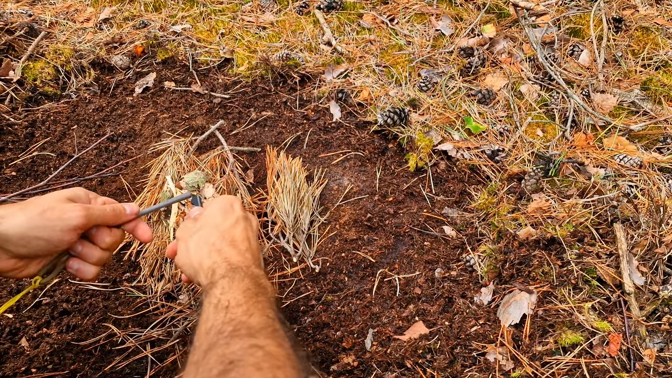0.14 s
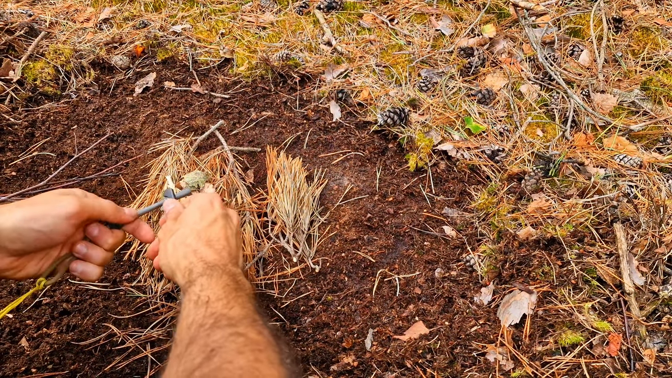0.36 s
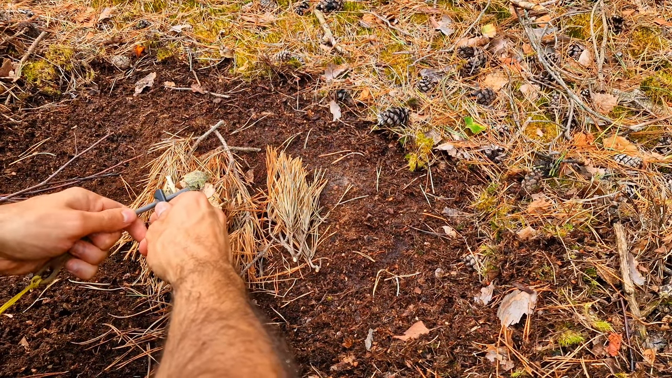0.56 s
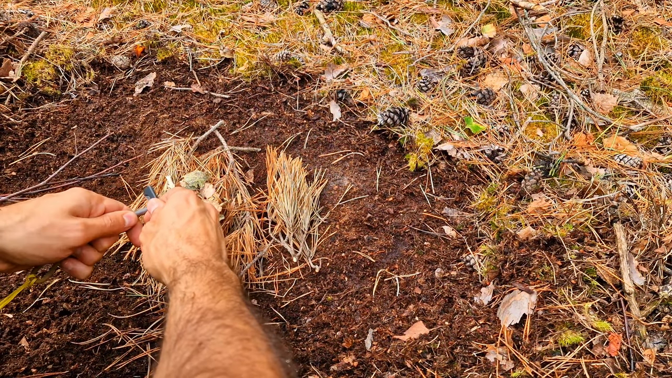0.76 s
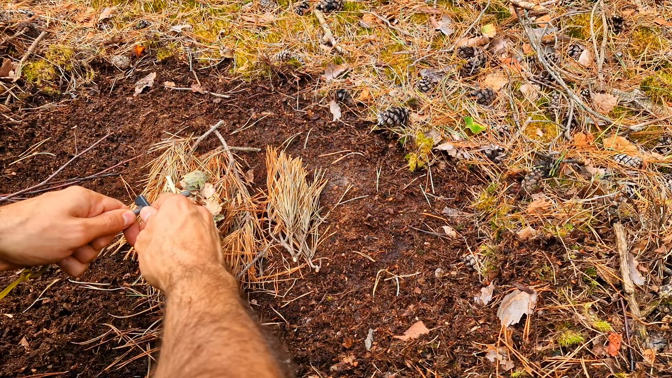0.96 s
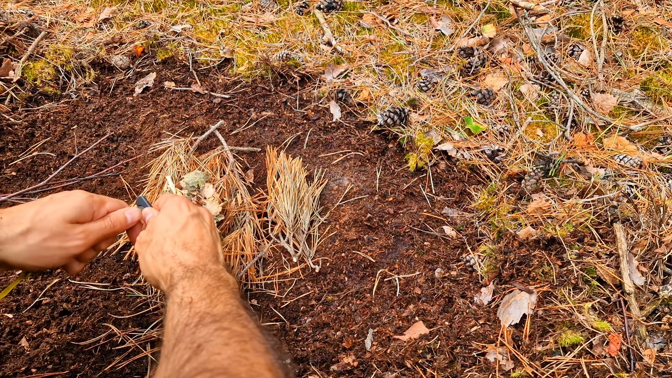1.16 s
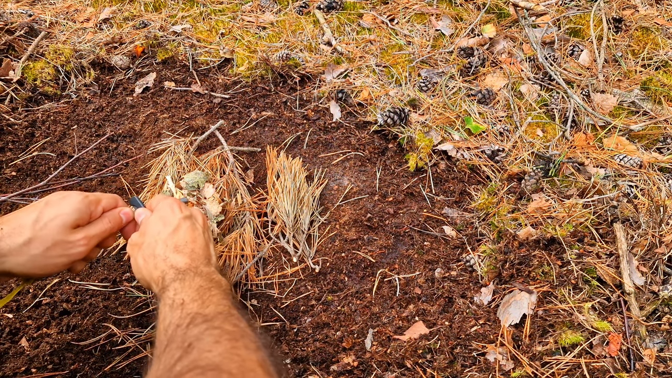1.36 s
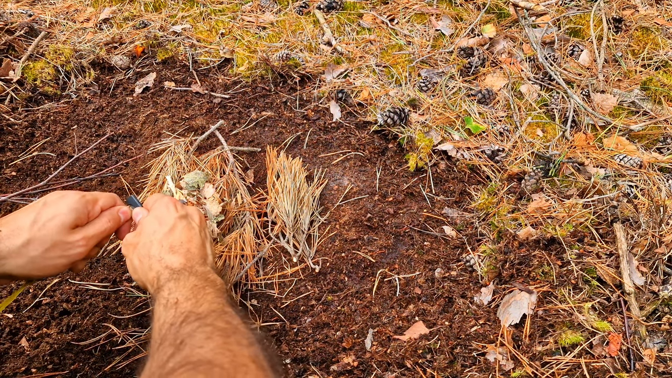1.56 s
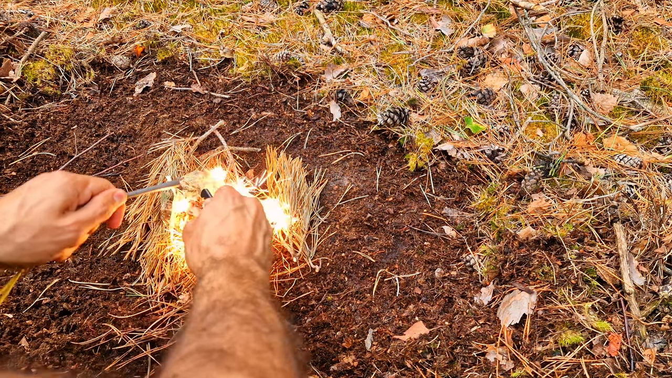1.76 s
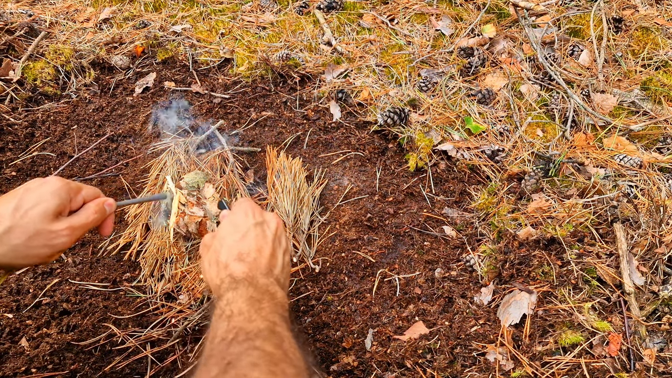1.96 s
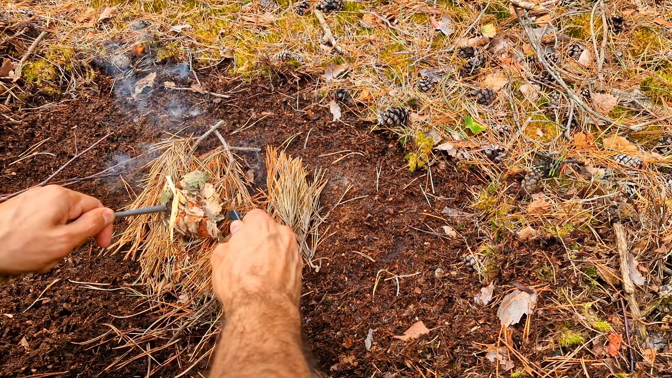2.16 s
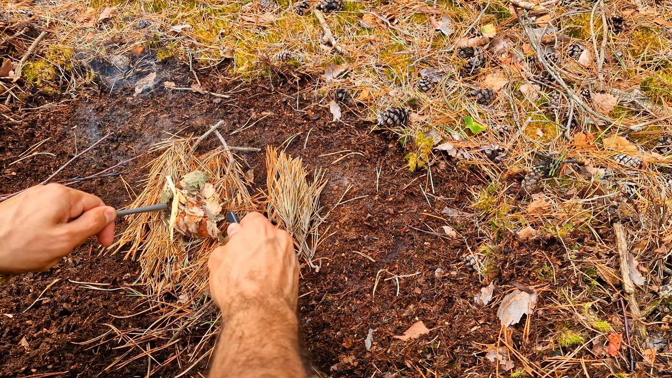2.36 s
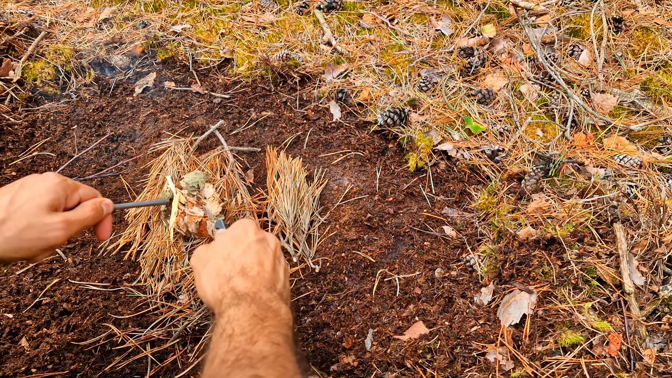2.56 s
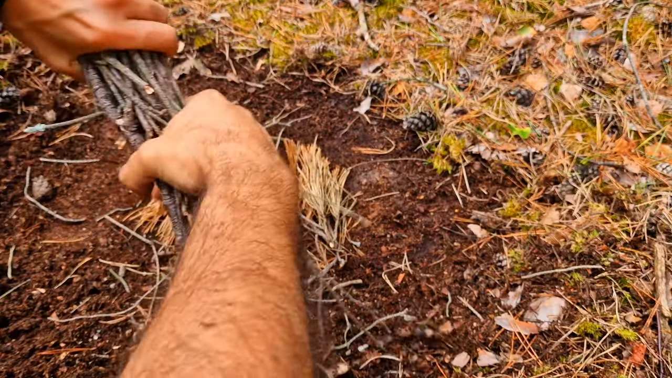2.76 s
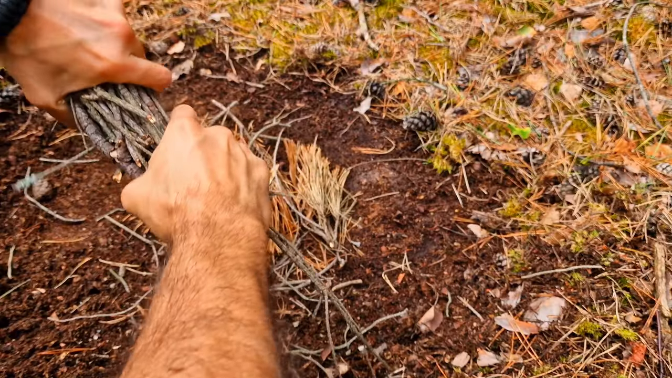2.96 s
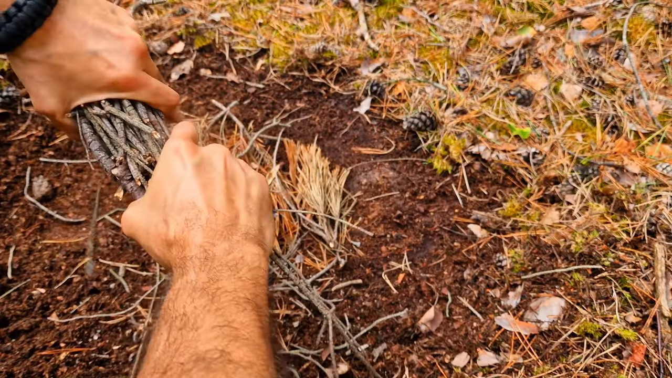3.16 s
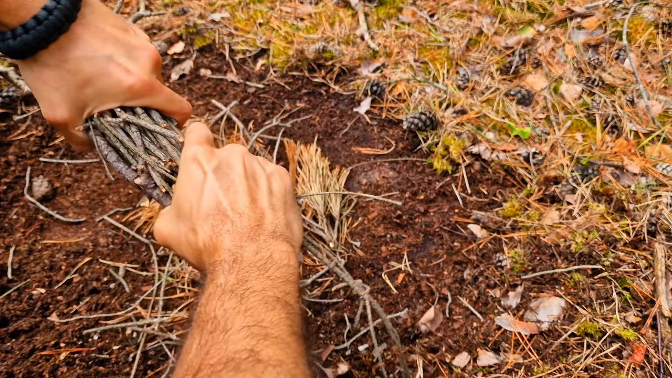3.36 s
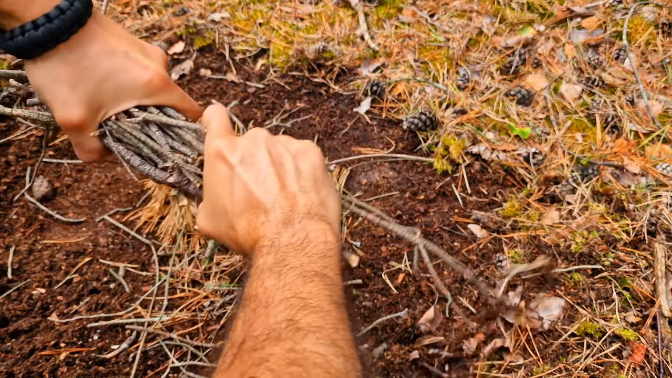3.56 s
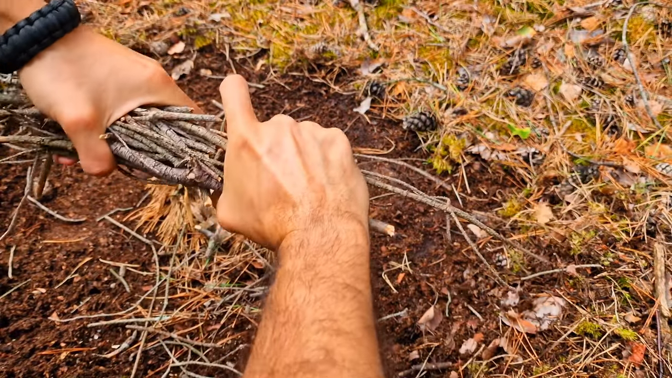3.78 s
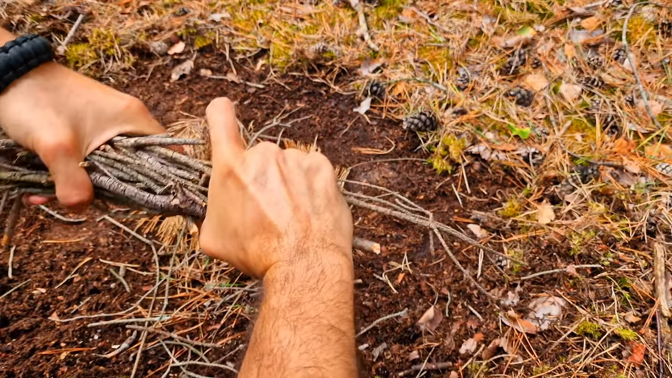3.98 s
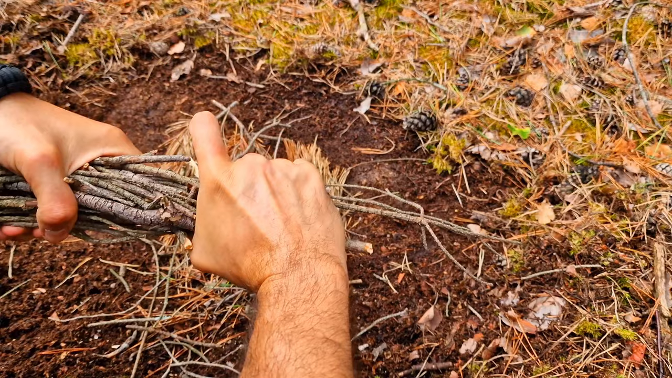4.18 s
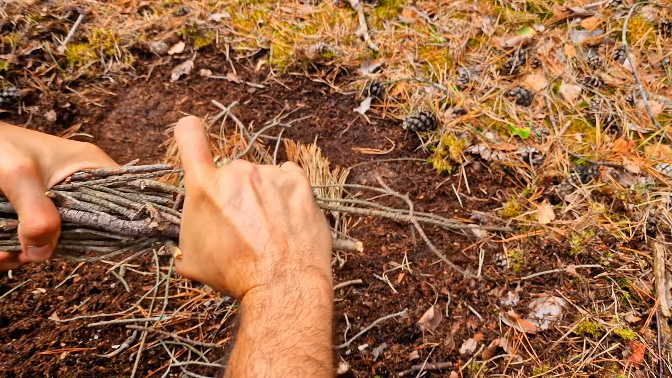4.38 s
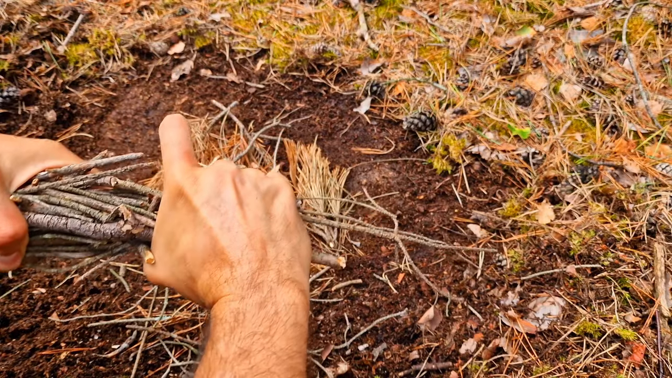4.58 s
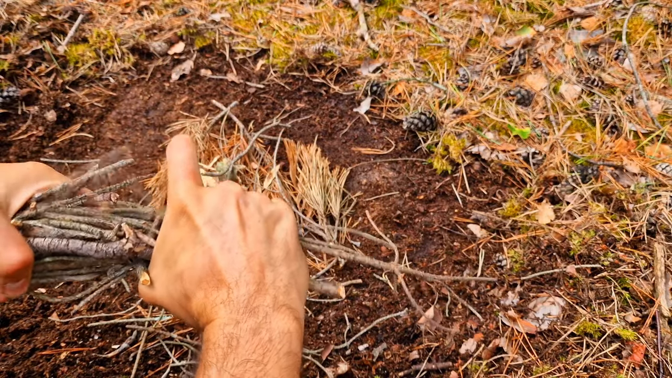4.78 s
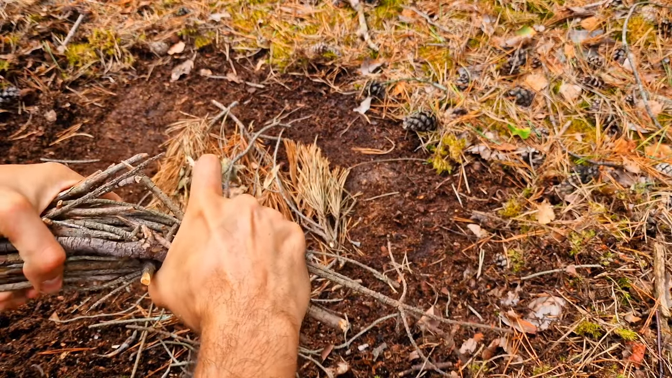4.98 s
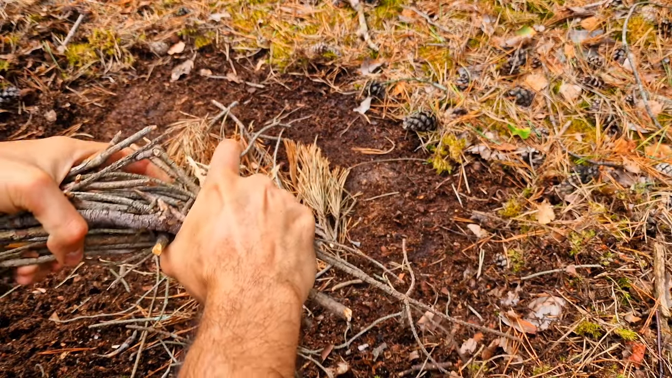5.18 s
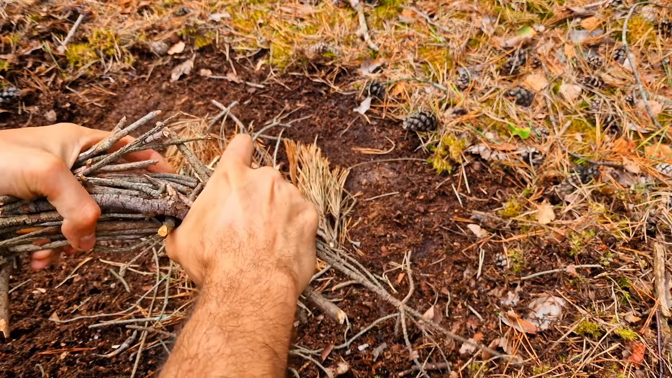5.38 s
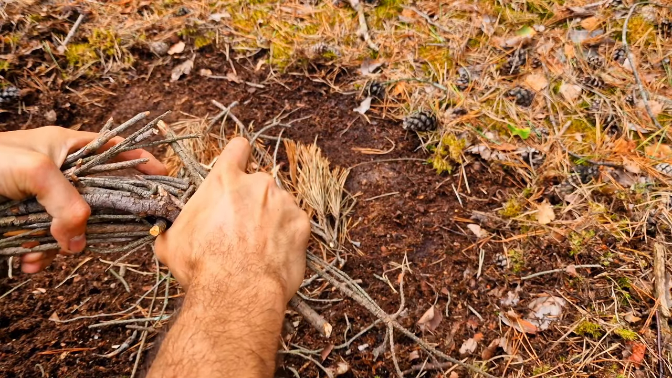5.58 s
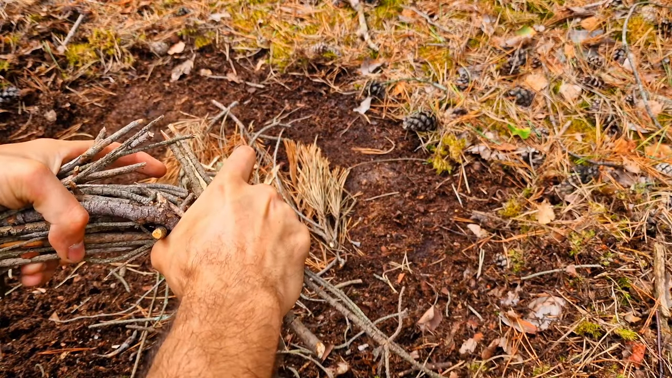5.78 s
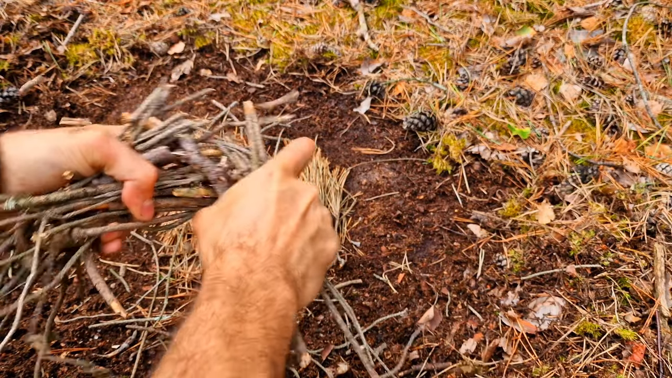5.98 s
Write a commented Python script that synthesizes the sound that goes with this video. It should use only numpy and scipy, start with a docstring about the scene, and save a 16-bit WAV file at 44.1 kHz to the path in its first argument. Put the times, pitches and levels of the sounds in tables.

```python
"""Far songbird whistles and a low wind rumble open the scene, close to a two-port camera on a forest floor.
A knock rings a hollow body, a steel striker scrapes a spark rod, sparks fizz and a flame puffs. Then a bundle of
dry twigs is squeezed and snapped by hand. Snaps, rubs, sparks and wind are coloured noise under envelopes; birds
are gliding sines smeared by a noise tail; the knock is a set of decaying sines.
"""
import sys
import numpy as np
from scipy import signal
from scipy.fft import rfft, irfft
from scipy.io import wavfile
from scipy.ndimage import uniform_filter1d

SR = 44100
rng = np.random.default_rng(int(sys.argv[2]) if len(sys.argv) > 2 else 0)


def gain_from_db(level_db):
    """Convert decibel levels to linear amplitude factors (20 dB per decade)."""
    decades = np.asarray(level_db, float) / 20
    return 10 ** decades


def transcribe(u):
    """Save the signal u as a 16-bit wav file named by the first command-line argument.

    u: samples, shape (n,) or (channels, n), limited to [-1, 1]; the rate is SR.
    q: integer samples, one column per channel.
    """
    v = np.clip(np.atleast_2d(u).T, -1, 1)
    q = np.round(v * 32767).astype(np.int16)
    wavfile.write(sys.argv[1], SR, q)


N = 265923
T = np.arange(N) / SR
BUNDLE_S = 2.74  # the bundle is in hand from here on
PORT_LAG_S = .00022  # near sounds sit to the left and reach the right port later


# Twigs breaking in the hands. Each row: peak time in seconds, crack level in dB over 4 ms, woody lows in dB
# against the crack, brittle highs in dB against the crack, ring in Hz, mostly near 7.3 kHz.
TWIG_SNAPS = [(2.8185, -42, -18, -8, 3880), (2.8286, -38, -17, 1.5, 3750), (2.8388, -41, -17, -6, 5880),
              (2.8501, -36.5, -11, -4, 4780), (2.9173, -26.5, -48, 4.5, 7400),
              (2.9393, -42, -28, 8.5, 6630), (3.0083, -60, -10, 13, 8120), (3.022, -51.5, 3, 9, 3040),
              (3.0742, -30.5, -3, -2.5, 3570), (3.0917, -43, -3, 3, 9410), (3.1813, -35, -10, -7, 7540),
              (3.2055, -25.5, -11.5, 6, 7260), (3.3259, -33.5, -12, -19, 3530),
              (3.3507, -15, -9.5, 2.5, 680), (3.3587, -29.5, -12.5, 5, 7450), (3.3888, -44, -8, 4, 7210),
              (3.4434, -36.5, -11, 8, 7050), (3.4806, -47, -22, 17, 8350), (3.4918, -30.5, -6.5, 6, 6700),
              (3.5027, -38, -5, 6, 6240), (3.5403, -45, -11, 12, 7360), (3.556, -30, -35, 1.5, 7520),
              (3.5829, -44.5, -3, 8, 6870), (3.5967, -49, -3, 15, 7620), (3.6324, -16.5, -9.5, 2, 7330),
              (3.6381, -17, -17, 7.5, 7880), (3.6482, -30, -5, 7, 8200), (3.6647, -42, -8, 3, 8660),
              (3.6937, -23.5, -3.5, 3.5, 1850), (3.6979, -29.5, -8, -3, 7060), (3.7082, -43, -8, 11, 7520),
              (3.7323, -37, -14, 0, 3250), (3.7505, -18, -20, -1, 6650), (3.7674, -36, -11.5, 14, 7600),
              (3.8184, -41, -11, 2, 7260), (3.8333, -26.5, -34, 4, 7240), (3.8449, -35, -16, 4.5, 7300),
              (3.8825, -41, -33, 0, 5030), (3.9154, -39.5, -35, 1.5, 6230), (3.9456, -41.5, -23, -13, 3830),
              (4.0138, -46, -22, 4, 7410), (4.0458, -19.5, -4, 6.5, 1100), (4.0849, -33, -23, 4, 6310),
              (4.0982, -23, -27, 5, 6940), (4.1179, -28, -32, 8, 6590), (4.1288, -10.5, -18, -4, 4710),
              (4.1676, -38, 1, 0, 1590), (4.2461, -47, -17, 2, 3550), (4.2785, -41, -6, -9, 7130),
              (4.2847, -41, -14, 1, 5430), (4.2972, -34, -21, -1, 7060), (4.3091, -13.5, -17, -6, 6650),
              (4.3152, -20, -11, 1, 7300), (4.3415, -42, -17, -4, 4240), (4.3502, -42, -22, -3, 8630),
              (4.3712, -21, -25, 2, 7550), (4.486, -27, -16, 4, 790), (4.5668, -8.5, -13, -2.5, 3100),
              (4.5843, -34, -23, -2, 7130), (4.6574, -38.5, -22, -9, 7580), (4.7105, -20.5, -8, 9, 7300),
              (4.7194, -13, -26, 3, 7770), (4.7305, -18, -11, -3, 4470), (4.7388, -38, -27, 11, 7800),
              (4.7497, -25, -37, 4, 6200), (4.7692, -11, -8, -2.5, 7670), (4.802, -15, -8.5, 4, 7540),
              (4.8302, -13.5, -12.5, -3, 3530), (4.8471, -18.5, -15, 2, 6600),
              (4.8722, -13.5, -9, -0.5, 5600), (4.8846, -23, -14, -0.5, 6160), (4.9344, -31, -4.5, 8, 9550),
              (5.0204, -37.5, -4, 16.5, 8900), (5.0393, -43, -3, 4, 7880), (5.0502, -44.5, -2, -3, 5190),
              (5.1346, -26, -20, 1.5, 8420), (5.1408, -41, -25, 9, 7520), (5.1495, -28, -36, -9, 7200),
              (5.1615, -40, -14, -8, 3660), (5.2065, -33, -27, 2, 5020), (5.2246, -12, -33, 1, 5230),
              (5.2371, -13.5, -16, 1.5, 7550), (5.272, -15.5, -18.5, 3, 6160), (5.2881, -32, -13, 2, 7670),
              (5.3554, -33.5, -4, -10, 1970), (5.3833, -27.5, -49, 4.5, 8350), (5.4347, -55, -18, 10, 7470),
              (5.5064, -56.5, -16, 16, 6480), (5.5268, -36, -13, 0.5, 6240), (5.5354, -53, -18, 13, 7130),
              (5.5705, -43, -29, 12.5, 7300), (5.6294, -40, -20, -8, 4220), (5.6691, -42, -31, 12.5, 7000),
              (5.6733, -36, -14, -11, 3850), (5.7124, -37.5, -37, -4.5, 7100),
              (5.7849, -35, -15, -3.5, 4670), (5.8538, -12, -22.5, 1, 7540),
              (5.8716, -16.5, -36, 2.5, 6630), (5.8907, -11.5, -15, 3.5, 7080),
              (5.9011, -14, -17, -0.5, 7340), (5.9145, -19.5, -9, 6.5, 5300), (5.9264, -19, -15, 5, 7070),
              (5.9391, -29, -23, 1, 5510), (5.9483, -26, 0, 12.5, 7300), (5.9838, -27.5, -11, 1.5, 770)]


def twig_snaps():
    """Each stick breaks as one crack, with faint cracks at chance moments between."""
    return cracks(list(TWIG_SNAPS) + faint_cracks(count=90))


def faint_cracks(count):
    """Small fibres give way at random: mostly faint rows, each with its own colour and ring."""
    moment, loudness, pitch = rng.random((count, 3)).T
    low, high = rng.standard_normal((count, 2)).T
    peak_s = BUNDLE_S + moment * (T[-1] - BUNDLE_S)
    crack_db = -57 - 2.5 * np.log(loudness)
    ring_hz = 7600 * (1 - .55 * pitch ** 3)
    return list(zip(peak_s, crack_db, -13 + 5 * low, 4 + 5 * high, ring_hz))


# Small ticks of rod and striker. Each row: peak time in seconds, crack level in dB over 4 ms, lows in dB #
# against the crack, highs in dB against the crack, ring in Hz.
ROD_TICKS = [(.94, -50.5, -33, -15, 4340), (1.884, -48, -6, -11, 5030), (2.007, -44, -18, -10, 5000),
             (2.014, -54, -4, 4, 6000), (2.075, -46, -10, 2, 6000)]


def rod_ticks():
    """Rod and striker tick as small cracks."""
    return cracks(ROD_TICKS)


def crack_shape(t):
    """Fibres tear within a few ms: a quick swell, a steep fall, a fainter scatter, then splinters."""
    rise = np.exp(t / .0005) + gain_from_db(-21) * np.exp(t / .0057)
    scatter = gain_from_db(-18) * np.exp(-t / .005)  # off the bundle
    splinters = gain_from_db(-31) * np.exp(-t / .013)  # keep tearing after the crack
    return np.where(t < 0, rise, np.exp(-t / .0011) + scatter + splinters)


def cracks(rows):
    """A ragged noise burst per row, split into woody, middle and brittle bands, with one ring per crack."""
    size, lead = 2560, 448  # samples in a crack, and of them before its peak
    out = np.zeros((2, N + 4096))
    t = (np.arange(size) - lead) / SR
    shape = crack_shape(t)
    core = (t > -.0015) & (t < .0025)  # the 4 ms that set the level
    for s, crack_db, low_db, high_db, ring_hz in rows:
        # thicker sticks have stronger and deeper lows
        wood_hz = (1500 - 15 * low_db) * np.exp(.08 * rng.standard_normal())
        wood_hz = min(np.clip(wood_hz, 600, 2100), ring_hz)  # a thick stick rings in the lows
        ragged = gain_from_db(3.0 * np.repeat(rng.standard_normal(size // 16), 16))
        burst = pair(0.45, PORT_LAG_S, size=size) * shape * ragged
        # the hands work a little left and drift to the middle
        pan_db = 3 - .6 * s + rng.standard_normal()
        ring = 0.79 * colour(burst, [(ring_hz / 1.42, -30), (ring_hz, 0), (ring_hz * 1.12, -30)])
        wood = colour(burst, [(100, -30), (250, -10), (wood_hz / 1.92, -7), (wood_hz, 0),
                              (wood_hz * 1.36, -6), (wood_hz * 3, -30)])
        body = colour(burst + ring, [(1500, -30), (2200, -4), (2800, -8), (4300, 0), (7000, -1), (8500, -30)])
        brittle = colour(burst + ring, [(5800, -30), (7400, 0), (10200, -3), (16000, -2), (17500, -20)])
        bands = [(0, body), (low_db, wood), (high_db, brittle)]
        sound = sum(gain_from_db(db) * x / np.std(x[:, core]) for db, x in bands)
        i = int(s * SR) - lead
        out[:, i:i + size] += sound * gain_from_db(crack_db + np.array([[pan_db], [-pan_db]]) / 2)
    return out[:, :N]


# Creaking of the bundle in the hands. Each row: time in seconds, rustle level in dB.
RUSTLE_LEVEL = [(2.74, -55), (2.82, -43), (3.03, -51), (3.3, -58), (3.45, -46.5), (3.8, -46), (3.97, -56.5),
                (4.13, -38), (4.35, -55), (4.61, -50.5), (4.74, -38), (4.88, -41), (4.99, -52), (5.12, -53),
                (5.25, -38), (5.33, -50), (5.55, -59), (5.82, -50), (5.93, -34), (6.0, -50)]
# Tone of bark and crushed needles. Each row: frequency in Hz, density in dB per Hz.
NEEDLE_TONE = [(150, -42), (250, -9.5), (955, -8), (2090, -0.5), (2530, -5), (7190, 4.5), (10700, -8),
               (14900, 1.5), (16000, -25)]


def rustle():
    """Bark rubs and needles crush: dense small clicks over a soft hiss."""
    grains = pair(0.16, PORT_LAG_S) * (0.51 + 0.65 * crackle(300, 6, 0.0011))
    grip = 0.3 + .85 * abs(flutter(25.4, size=N))  # slips and holds
    left_right = gain_from_db(np.array([[1.2], [-1.2]]))
    return unit(colour(grains * grip, NEEDLE_TONE)) * curve(RUSTLE_LEVEL) * left_right


def strike():
    """Striker on spark rod: one gritty noise feeds scrape and sparks; steel and flame join in."""
    grit = pair(0.36, PORT_LAG_S) * (.8 + .6 * crackle(700, 3, .0015))
    return scrape(grit) + sparks_and_needles(grit) + steel_ring() + flame_and_thud()


# Tone of the scrape. Each row: frequency in Hz, density in dB per Hz.
SCRAPE_TONE = [(1200, -28), (2400, -20), (2900, -8), (4300, 0), (6000, -8), (11000, -8), (15500, -1),
               (16500, -6)]
# Steel along the rod. The row: time at full level in seconds, level in dB, hold in seconds,
# rise in dB per second, fall in dB per second.
SCRAPE_SWELL = (1.624, -28, .072, 3000, 700)


def scrape(grit):
    """Steel drags along the rod: gritty noise with a short flat swell."""
    return unit(colour(grit, SCRAPE_TONE)) * swell(*SCRAPE_SWELL)


# Tone of sparks and dry needles. Each row: frequency in Hz, density in dB per Hz.
SPARK_TONE = [(1500, -21.5), (2600, -17), (3500, -20), (6500, -8.5), (9500, -21.5), (15000, -15),
              (16000, -35)]
# Swells of sparks fizzing in the tinder, the last of them smouldering, a hand dropping into dry needles and
# the needles settling under it. Each row: time at full level in seconds, level in dB, hold in seconds,
# rise in dB per second, fall in dB per second.
SPARK_SWELL = (1.715, -25, .075, 900, 260)
EMBER_SWELL = (1.87, -50, .0, 300, 120)
DROP_SWELL = (2.044, -27, .008, 6000, 1300)
SETTLE_SWELL = (2.06, -44, .018, 2000, 1800)


def sparks_and_needles(grit):
    """Fizz, smoulder and needle crunch are one bright gritty hiss under four swells."""
    swells = (SPARK_SWELL, EMBER_SWELL, DROP_SWELL, SETTLE_SWELL)
    return unit(colour(grit, SPARK_TONE)) * sum(swell(*row) for row in swells)


# Pitch of the singing steel. Each row: time in seconds, ring in Hz.
STEEL_PITCH = [(1.62, 8350), (1.655, 8300), (1.675, 9410), (1.69, 8640), (1.71, 7950)]
# The steel sings. The row: time at full level in seconds, level in dB, hold in seconds,
# rise in dB per second, fall in dB per second.
RING_SWELL = (1.668, -21, .03, 550, 3000)


def steel_ring():
    """The striker rings: a gliding tone blurred by noise into a narrow band."""
    real = unit(colour(pair(0.43), [(1, -7), (600, 2.5), (1600, -29.5)]))
    imaginary = unit(colour(pair(0.9), [(1, 7.5), (600, 3.5), (1600, -29.5)]))
    hz = np.interp(T, *np.transpose(STEEL_PITCH))
    carrier = np.exp(2j * np.pi * np.cumsum(hz) / SR)
    steel = ((real + 1j * imaginary) * carrier).real
    return steel * swell(*RING_SWELL) * (T > STEEL_PITCH[0][0])


# Flame catches. The row: time at full level in seconds, level in dB, hold in seconds,
# rise in dB per second, fall in dB per second.
PUFF_SWELL = (1.735, -31.5, .045, 450, 250)


def flame_and_thud():
    """A low uneven puff as flame catches; the same lows give the dropping hand its thud."""
    uneven = pair(1.0) * (0.9 + 0.48 * crackle(300, 1.2, 0.0087))
    puff = unit(colour(uneven, [(30, -34), (60, -2), (310, -1.5), (500, -10.5), (700, -8.5),
                                (1500, -22.5), (2500, -22), (4000, -38)]))
    return puff * (swell(*PUFF_SWELL) + gain_from_db(-19) * swell(*DROP_SWELL))


# Blows near the camera. Each row: time in seconds, strength in dB, contact in seconds.
KNOCK_BLOWS = [(0.274, -48, 0.0025), (.306, -39, 0.00067), (0.31, -45, 0.00067), (0.319, -49, 0.0022)]
# Modes of the hollow body. Each row: frequency in Hz, level in dB, decay by 60 dB in seconds.
BODY_MODES = [(80, -6, .25), (150, -3, .06), (549, -16, .17), (1394, -20, .04), (2000, -22, .04)]


def knock():
    """Soft blows, bell-shaped pushes, ring a hollow body of decaying sine modes."""
    push = np.zeros(SR)
    for s, db, contact_s in KNOCK_BLOWS:
        push += gain_from_db(db) * np.exp(-((T[:SR] - s) / contact_s) ** 2 * 8) / (contact_s * SR) * 8
    t = T[:SR // 2]
    ring = np.zeros(len(t))
    for hz, db, t60 in BODY_MODES:
        ring += gain_from_db(db) * np.sin(2 * np.pi * hz * t) * np.exp(-np.log(1000) * t / t60)
    out = np.zeros((2, N))
    out[:, :SR] += signal.fftconvolve(push, ring)[:SR]
    return out


# Scuff riding on the knock. Each row: time in seconds, level in dB.
SCUFF_LEVEL = [(.26, -75), (.275, -57), (.3, -54), (.31, -41), (.33, -47), (.36, -55), (.42, -75)]


def scuff():
    """A short rub: soft noise that follows the level table and stops at its end."""
    rub = unit(colour(pair(0.23), [(200, 0.5), (2000, -4), (5000, -11), (16000, -31)]))
    return rub * curve(SCUFF_LEVEL) * (T < SCUFF_LEVEL[-1][0])


# Straight glides. Each row: start in seconds, length in seconds, first Hz, last Hz, level in dB.
GLIDES = [(-.15, .13, 2800, 1850, -59), (-.1, .08, 4300, 3700, -59.5), (.691, .014, 4000, 2700, -63.5),
          (.195, .028, 2830, 2200, -61), (.22, .078, 2170, 2120, -58.5), (.51, .22, 1560, 1434, -71),
          (.748, .137, 8450, 8500, -80), (.8, .147, 6100, 6050, -77), (.982, .09, 4300, 4780, -71),
          (1.128, .025, 3200, 4300, -62), (1.15, .15, 4330, 4400, -59), (1.176, .024, 4800, 4650, -50),
          (1.21, .04, 4650, 4850, -56), (1.26, .05, 4750, 4650, -64), (1.319, .041, 4700, 4750, -59),
          (1.241, .274, 5550, 5450, -78), (1.24, .047, 3300, 3750, -72), (1.378, .048, 4530, 4800, -61),
          (1.31, .035, 4350, 3150, -59), (1.43, .08, 4550, 4700, -54.5), (1.465, .015, 4300, 3900, -51),
          (1.485, .03, 3950, 3550, -55), (1.555, .03, 4800, 4650, -54), (1.585, .03, 4500, 3900, -54),
          (1.106, .4, 1916, 1820, -66), (1.5, .128, 2350, 2300, -72), (1.898, .051, 4700, 4300, -55.5),
          (2.058, .084, 4326, 4270, -61.5), (1.89, .206, 2110, 2040, -75), (2.455, .02, 4300, 5440, -60),
          (2.47, .058, 5500, 5500, -63), (2.521, .036, 3740, 2950, -53.5), (2.596, .14, 3010, 3160, -66),
          (2.625, .06, 4200, 3900, -52), (2.715, .02, 3750, 3450, -56), (2.795, .055, 3880, 3860, -48),
          (2.855, .035, 3300, 2950, -56), (2.9, .05, 3100, 3150, -60), (2.97, .025, 3380, 3380, -53),
          (3.05, .1, 3650, 3500, -58), (3.235, .06, 3320, 3220, -61), (4.38, .1, 3600, 3600, -62.5),
          (5.634, .23, 1725, 1613, -67.5), (5.683, .127, 1286, 1230, -68)]
# Calls that hang on a pitch and then plunge. Each row: start in seconds, hang in seconds, top in Hz,
# end in Hz, level in dB.
PLUNGES = [(.078, .032, 5500, 3680, -57), (.385, .02, 5200, 3740, -56), (.665, .022, 6550, 3860, -58.5),
           (1.09, .022, 6750, 4600, -63)]
# Thin high whistles that arch up and down. Each row: start in seconds, level in dB.
ARCHES = [(-.1, -64.5), (.185, -65.5), (.477, -67)]
# The note a trill repeats. The row: length in seconds, first Hz, last Hz, level in dB.
TRILL_NOTE = (.011, 3950, 3500, -60)


def birds():
    """Whistles waver on their way through moving leaves; the trunks smear each into a long thin tail."""
    lead = int(.5 * SR)  # song from just before still hangs among the trees
    song = [glide(*row) for row in GLIDES]
    song += [whistle(s, plunge(hang_s, top_hz, end_hz), db) for s, hang_s, top_hz, end_hz, db in PLUNGES]
    arch = np.sin(np.linspace(0, np.pi, int(.122 * SR))) ** .6
    song += [whistle(s, 7280 + (7760 - 7280) * arch, db) for s, db in ARCHES]
    trill = [glide(.762 + k * .0387, *TRILL_NOTE) for k in range(8)]
    dry_song, dry_trill = lay_out(song, lead), lay_out(trill, lead)
    sent = dry_song + gain_from_db(-8) * dry_trill  # the trilling bird sits close: less comes back from the trees
    wet = signal.fftconvolve(sent[None], tree_tail(), axes=1)[:, :N + lead]
    return (dry_song + dry_trill + wet)[:, lead:]


def lay_out(notes, lead):
    """Sum timed notes on one line that begins lead samples early."""
    line = np.zeros(N + lead)
    for s, note in notes:
        i = int(s * SR) + lead
        line[i:i + len(note)] += note
    return line


def tree_tail():
    """Scatter between trunks: noise, nearly alike in both ports, dying by 60 dB in 1 s."""
    t = T[:2 * SR]
    tail = pair(1 - .072, size=len(t)) * np.exp(-np.log(1000) * t)
    return tail / np.sqrt(np.sum(tail[0] ** 2))


def glide(s, length_s, first_hz, last_hz, db):
    """A note whose pitch moves in a straight line."""
    return whistle(s, np.linspace(first_hz, last_hz, int(length_s * SR)), db)


def plunge(hang_s, top_hz, end_hz):
    """Pitch that sags for a moment, then drops at a steady rate."""
    t = np.arange(int(.2 * SR)) / SR
    octaves = 2.5 * t + 17 * np.maximum(t - hang_s, 0)  # octaves per second: sag, and plunge on top
    hz = top_hz * 2 ** -octaves
    return hz[hz > end_hz]


def whistle(s, hz, db):
    """One note from its pitch track; brief chirps pass before the leaves have moved."""
    u = np.linspace(0, 1, len(hz))
    depth = min(len(hz) / SR / .06, 1)  # full waver from 60 ms
    waver = depth * flutter(90 + np.mean(hz) * .03, size=len(u))
    tone = np.exp(2j * np.pi * np.cumsum(hz) / SR) * (0.72 + 1.04 * waver)
    return s, gain_from_db(db) * np.sqrt(2) * np.sin(np.pi * u) ** 0.12 * tone.real


# Blurred song too far off to part into notes. Each row: time in seconds, level in dB.
CHORUS_LEVEL = [(0, -95), (.26, -94), (.33, -63), (.75, -71.5), (.95, -74), (1.2, -69.5), (1.9, -59.5),
                (2.2, -96), (2.7, -85), (4.1, -68), (4.3, -57.5), (4.55, -60.5), (5.5, -75), (5.7, -61.5),
                (5.9, -58)]


def far_chorus():
    """Distant song merges into a fluttering noise band around 1-2 kHz."""
    band = unit(colour(pair(0.98), [(900, -29), (1200, -3), (1600, -3), (1900, -6.5), (2300, -37)]))
    return band * (0.47 + .5 * abs(flutter(14, size=N))) * curve(CHORUS_LEVEL)


# Tone of the wind, and of the fuller lows once the bundle is in hand. Each row: frequency in Hz,
# density in dB per Hz.
WIND_TONE = [(15, -27.5), (25, -13.5), (59, 0), (198, -19.5), (217, -25), (261, -22), (361, -48.5),
             (1000, -57.5), (1300, -47), (2200, -120)]
HANDLING_TONE = [(15, -24), (25, -7), (54, 0.5), (81, 1.5), (136, -3), (227, -19), (500, -31.5), (650, -45),
                 (1100, -120)]
# Dull thumps of the hands. Each row: time in seconds, level in dB.
HAND_JOLTS = [(.0, -56), (.7, -57), (2.84, -54), (4.05, -47), (4.3, -50), (4.8, -38), (4.94, -48),
              (5.76, -49), (5.87, -40)]


def wind():
    """Low rumble, much alike in both ports, swayed by gusts and pushed up by thumps of the hands."""
    in_hand = T >= BUNDLE_S
    rumble = np.where(in_hand, unit(colour(pair(0.82), HANDLING_TONE)), unit(colour(pair(0.88), WIND_TONE)))
    gust_db = 1.2 * flutter(3, size=N).real
    gusts = gain_from_db(np.where(in_hand, -52.5, -60) + gust_db)
    jolts = sum(swell(s, db, 0, rise_db_s=300, fall_db_s=200) for s, db in HAND_JOLTS)
    return rumble * (gusts + jolts)


# Tone of the woodland air. Each row: frequency in Hz, density in dB per Hz.
AIR_TONE = [(300, -3.5), (700, -2.5), (1200, -13.5), (2000, -8), (2800, -12), (4000, -8), (6000, -14),
            (8000, -15.5), (9300, -31), (16000, -20)]


def woodland_air():
    """Faint steady air: coloured noise, partly alike in both ports."""
    return unit(colour(pair(0.72), AIR_TONE)) * gain_from_db(-69)


def unit(x):
    """Scale to rms 1."""
    return x / np.sqrt(np.mean(x ** 2))


def colour(x, points):
    """Shape the spectrum along (Hz, dB) points."""
    hz, db = np.transpose(points)
    n = x.shape[-1]
    f = np.maximum(np.arange(n // 2 + 1) * SR / n, 1)
    return irfft(rfft(x) * gain_from_db(np.interp(np.log(f), np.log(hz), db)), n)


def curve(rows):
    """Gain from a dB column: silent before the table, holding its last level after."""
    rows = np.array(rows)
    return gain_from_db(np.interp(T, rows[:, 0], rows[:, 1], left=-200))


def swell(s, db, hold_s, rise_db_s, fall_db_s):
    """Gain that climbs, holds and dies away at steady dB rates."""
    return gain_from_db(db - rise_db_s * np.clip(s - T, 0, 1) - fall_db_s * np.clip(T - s - hold_s, 0, 1))


def pair(alike, lag_s=0., size=N):
    """Two noises sharing a part, which the right port hears late."""
    common, left, right = rng.standard_normal((3, size))
    shared = np.array([common, np.roll(common, round(lag_s * SR))])
    return np.sqrt(alike) * shared + np.sqrt(1 - alike) * np.array([left, right])


def crackle(per_s, spread_db, fall_s):
    """Envelope of scattered tiny clicks, mostly small, a few large."""
    click_db = np.minimum(spread_db * rng.exponential(size=N), 16)
    hits = (rng.random(N) < per_s / SR) * gain_from_db(click_db)
    return unit(signal.lfilter([1], [1, -np.exp(-1 / (fall_s * SR))], hits))


def flutter(hz, size):
    """Slow complex noise of rms 1: blurs a pure tone into a narrow wavering band."""
    k = int(SR / hz)
    z = rng.standard_normal((2, size + 2 * k))
    z = uniform_filter1d(uniform_filter1d(z, k), k)[:, k:-k]
    return (z[0] + 1j * z[1]) * np.sqrt(3 * k) / 2


# The housing hides the right port from near treble. Each row: frequency in Hz, gain in dB.
HOUSING_SHADE = [(1000, -0.5), (8000, -2), (12000, -1.5), (16000, -14)]


def scene():
    """Snaps, rubs and strike reach the right port a little duller; the rest is unshaded."""
    near = twig_snaps() + rod_ticks() + rustle() + strike()
    near = np.array([near[0], colour(near[1], HOUSING_SHADE)])
    return near + knock() + scuff() + birds() + far_chorus() + wind() + woodland_air()


def top_cut(x):
    """Nothing passes above the cut-off."""
    return signal.sosfilt(signal.butter(12, 16640, fs=SR, output="sos"), x)


def record(dry):
    """A steep filter cuts the top above 16.1 kHz, and peaks are clipped at full scale."""
    low_pass = signal.ellip(8, .2, 60, 16100, fs=SR, output="sos")
    mix = np.clip(signal.sosfilt(low_pass, dry), -1, 1)
    return top_cut(mix)


dry = scene()
out = record(dry)
transcribe(out)
```